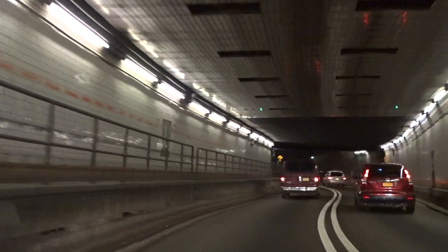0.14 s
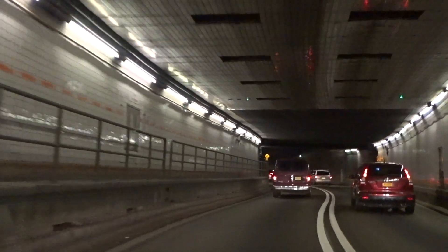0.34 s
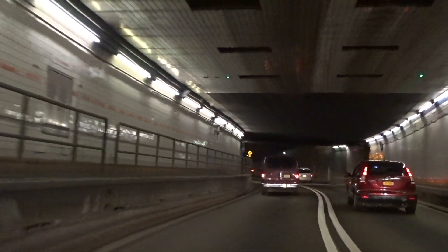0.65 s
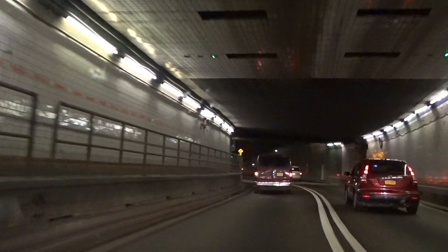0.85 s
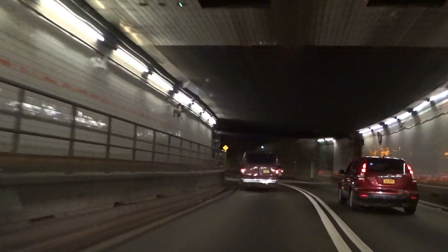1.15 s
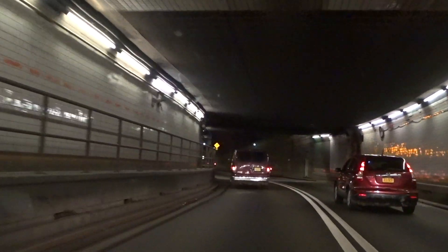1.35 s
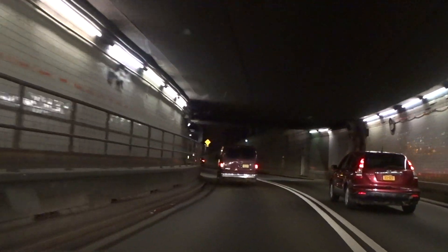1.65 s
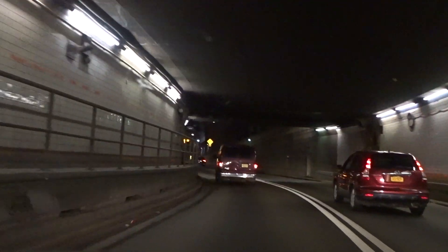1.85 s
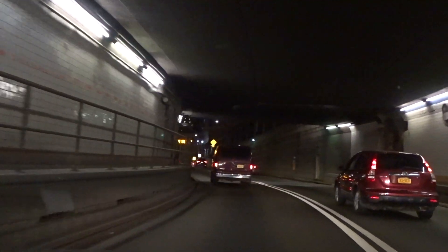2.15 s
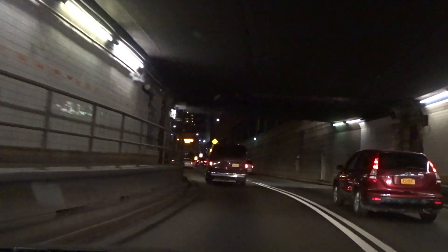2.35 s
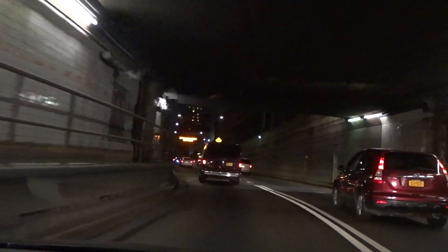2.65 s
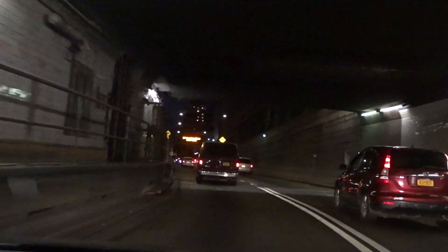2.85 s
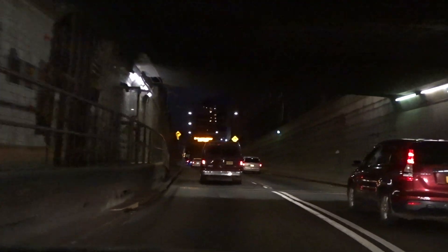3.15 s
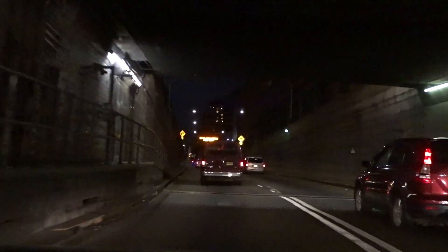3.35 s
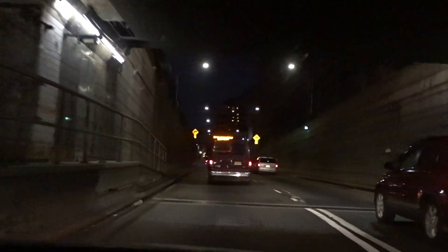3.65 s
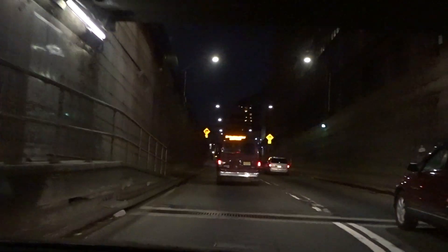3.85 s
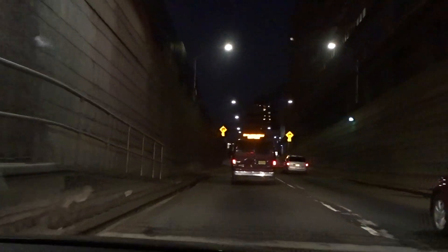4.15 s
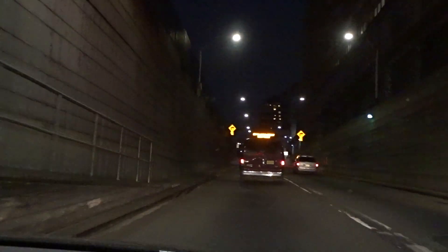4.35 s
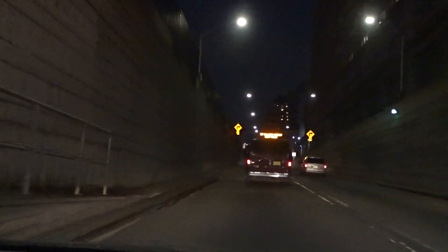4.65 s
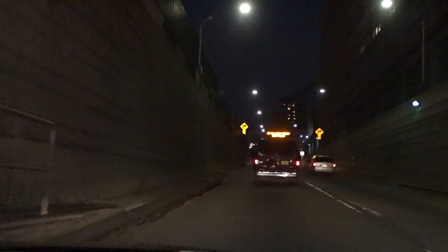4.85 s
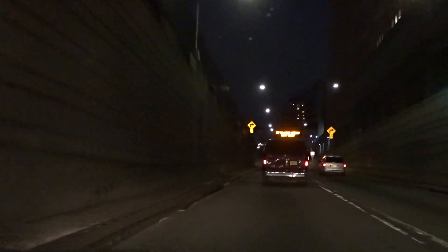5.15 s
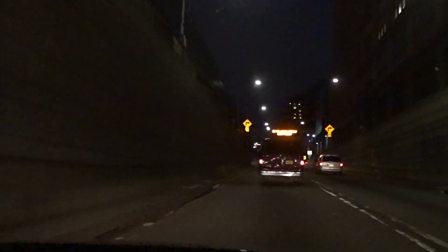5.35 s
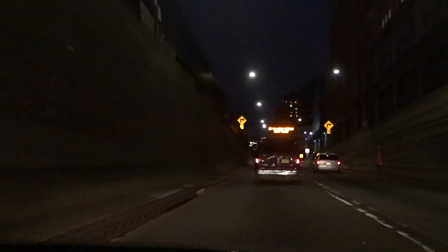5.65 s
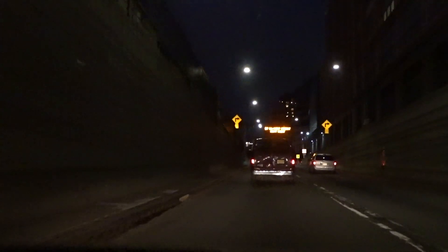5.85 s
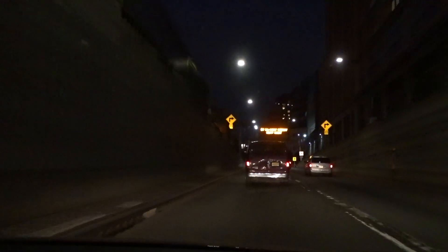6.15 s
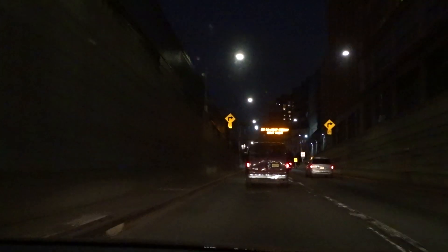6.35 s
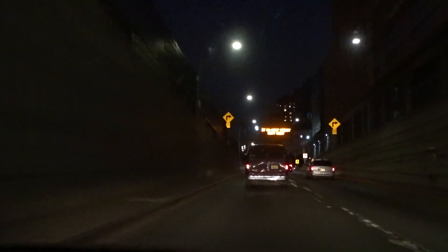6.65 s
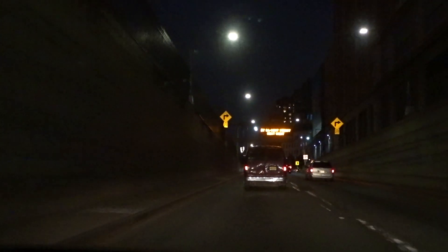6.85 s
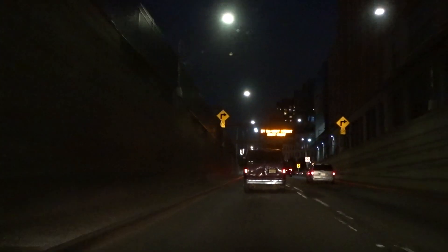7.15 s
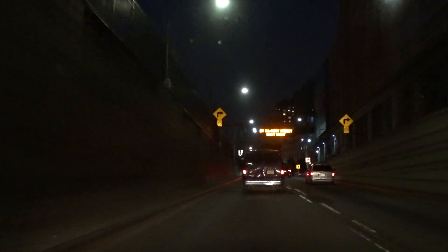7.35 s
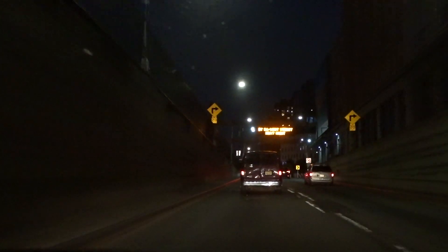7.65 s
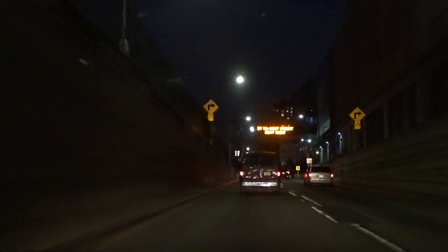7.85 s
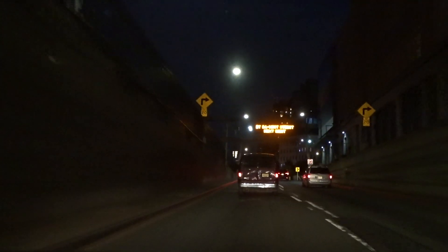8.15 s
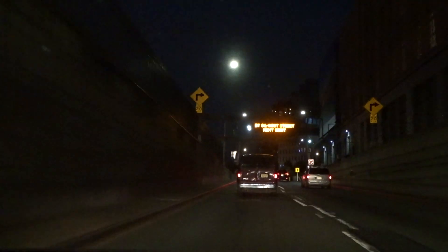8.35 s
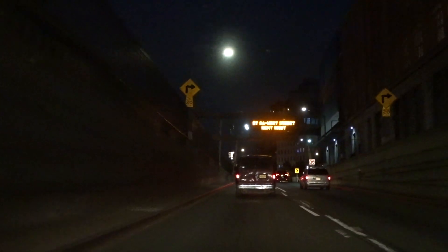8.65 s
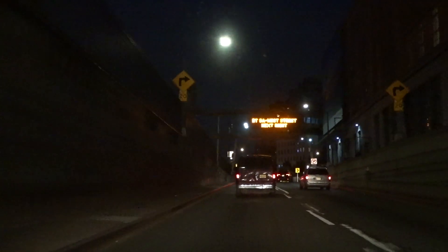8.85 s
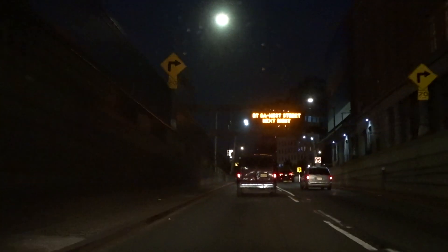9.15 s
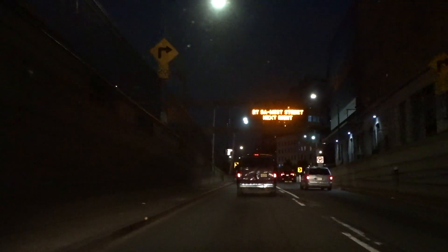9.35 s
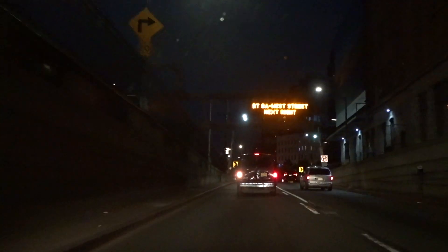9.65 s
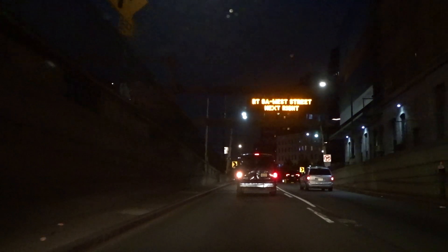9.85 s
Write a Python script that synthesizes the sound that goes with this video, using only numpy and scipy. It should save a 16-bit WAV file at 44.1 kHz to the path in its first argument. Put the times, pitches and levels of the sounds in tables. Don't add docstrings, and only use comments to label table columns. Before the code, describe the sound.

Steady cabin rumble as a car leaves a tunnel, with an early trim snap, a clattering bump midway, then quieter road noise and small ticks.

```python
import sys
import numpy as np
from scipy import signal
from scipy.fft import rfft, irfft, next_fast_len
from scipy.io import wavfile
from scipy.ndimage import uniform_filter1d, map_coordinates

SR = 44100
rng = np.random.default_rng(int(sys.argv[2]) if len(sys.argv) > 2 else 0)


def voltage_ratio(decibels):
    exponent = np.asarray(decibels, float) / 20
    return 10 ** exponent


def put_to_file(sound):
    columns = np.atleast_2d(sound).T
    safe = np.clip(columns, -1, 1)
    whole_steps = np.round(safe * 32767)
    wavfile.write(sys.argv[1], SR, whole_steps.astype(np.int16))


N = 440559
TIME_S = np.arange(N) / SR


def unit(x):
    return x / np.sqrt(np.mean(x ** 2) + 1e-20)


def along(points, hz):
    f, v = np.transpose(points)
    return np.interp(np.log(hz + 1), np.log(f + 1), v)


def curves(rows):
    s, *cols = np.transpose(rows)
    return [np.interp(TIME_S, s, c) for c in cols]


def wobble(rate):
    knots = rng.standard_normal(int(N * rate / SR) + 4)
    return map_coordinates(knots, [TIME_S * rate])


def filtered(x, response):
    m = next_fast_len(N + SR // 2)
    return irfft(rfft(x, m) * response(np.fft.rfftfreq(m, 1 / SR)), m)[..., :N]


def modes(table):
    def response(f):
        total = 0
        for k, (centre, width, db) in enumerate(table):
            resonance = 1j * f * width / (centre * centre - f * f + 1j * f * width)
            total = total + (-1) ** k * voltage_ratio(db) * resonance
        return total
    return response


def unrelated(table):
    return lambda f: np.sqrt(sum(np.abs(modes([row])(f)) ** 2 for row in table))


def rush(gain, patchy_db):
    # hz, correlation [-1..1]
    likeness = [(40, .9999), (150, .999), (230, .995), (420, .98), (600, .93), (1200, .87), (2500, .68),
                (3500, .77), (4800, .72), (7400, .83), (9800, .55)]
    z = signal.stft(rng.standard_normal((2, N)), nperseg=512)[2]
    field = rng.standard_normal(z.shape[1:])
    field = uniform_filter1d(field, size=6, axis=0)
    field = uniform_filter1d(field, size=14, axis=1)
    pair = signal.istft(z * voltage_ratio(patchy_db * unit(field)), nperseg=512)[1][:, :N]

    def response(hz):
        turn = np.arccos(np.clip(along(likeness, hz), -1, 1)) / 2
        return gain(hz) * [np.cos(turn), np.sin(turn)]

    mid, side = filtered(pair, response)
    return unit(np.array([mid + side, mid - side]))


def steadied(x, share):
    power = uniform_filter1d(uniform_filter1d(np.mean(x ** 2, axis=0), size=SR // 16), size=SR // 16)
    return unit(x / (np.abs(power) + 0.074) ** (share / 2))


def jolts():
    # peak_s, suspension_lift_db, panel_lift_db (negative:
    swings = [(.25, 0, -2.5), (.55, -5, 3.5), (5.08, 1, -2.5), (8.1, 0, -4.5), (2.98, 0, -2), (.8, -1, 2.5),
              (.97, -4, 4), (1.33, -2, -2), (1.55, -2, 1.5), (2.09, 6, 2.5), (2.78, -2, -1), (3.8, 3, 5.5),
              (3.96, -10, 4.5), (4.59, 9, 1.5), (4.73, 10, 5), (4.91, 18.5, 0), (5.26, 5, -3.5),
              (5.42, 9, 1), (6.19, 1, 1), (6.71, 2, 1.5), (7.63, 2, 5.5), (7.9, 6.5, 4), (8.71, -2, 4),
              (9.29, -12, 3.5), (9.46, 2, 2.5), (9.93, 10, 1)]
    rise_s, fall_s = 0.051, 0.056
    t = np.arange(0, N + 64, 64) / SR
    s, *lifts = np.transpose(swings)
    since = t - s[:, None]
    shape = np.exp(-(since / np.where(since < 0, rise_s, fall_s)) ** 2)
    return [np.interp(TIME_S, t, lift @ shape) for lift in lifts]


def stretches(table):
    edge_s = 0.15
    lift_db = 0
    for s, length, db in table:
        inside_s = np.minimum(TIME_S - s, s + length - TIME_S)
        lift_db = lift_db + db * np.clip(inside_s / edge_s + .5, 0, 1)
    return lift_db


def shell():
    # time_s, unevenness_db, tread_texture_db
    road = [(0, -24.5, -29), (.5, -26.5, -31), (1.1, -24.5, -29.5), (1.6, -26, -27), (2.2, -28, -27),
            (2.8, -26, -29.5), (3.4, -25.5, -27), (3.7, -28.5, -29), (4, -22.5, -29), (4.6, -24.5, -29),
            (5.05, -23.5, -31), (5.6, -26.5, -31.5), (6.4, -27, -31), (6.9, -24.5, -29.5),
            (7.7, -28, -30.5), (8.5, -26, -31), (9.1, -27.5, -28.5), (9.99, -26.5, -29)]
    heave = [(38.4, 11, 2.5), (62, 23, -16.5)]
    boom = [(103.7, 13.7, 1.5), (126.4, 10.8, -2), (164.4, 11.8, -0.5), (184.6, 6.3, -4)]
    cavity = [(228.3, 11.4, 1.5), (271.6, 37, -5)]
    drone = [(318.5, 62, -3.5), (355.5, 19.6, 3), (380, 65, -3.5), (443, 55, -4.5)]
    # start_s, length_s, lift_db (negative: dip)
    coarse = [(0, 0.42, 3), (2.35, 0.43, 1.5), (9.0, 0.43, -1), (1.2, 0.62, 2), (2.12, 1.45, 3.5),
              (3.707, 1.21, 6.5), (5.198, 0.8, 2.5), (5.9, 0.42, -1.5), (6.795, 0.31, 2), (7.55, 0.5, -3),
              (8.3, 0.88, 2), (9.62, 0.3, 4)]
    # start_s, length_s, lift_db (negative: dip)
    drone_swings = [
        (2.35, 0.75, 1.5),
        (3.35, 0.26, -2),
        (5.0, 0.4, -2),
        (5.9, 0.16, 3),
        (6.75, 0.13, 2),
        (7.2, 0.18, -3),
        (7.7, 0.15, 2.5),
        (8.5, 0.15, -2),
        (9.0, 0.16, -2.5),
    ]
    # start_s, length_s, lift_db (negative: dip)
    roof_swings = [
        (.75, 0.27, -3),
        (1.1, 0.28, 2),
        (3.05, 0.12, 3.5),
        (6.55, .2, -3.5),
        (8.1, 0.21, 3),
        (8.45, 0.32, -4),
        (9.25, 0.24, -3.5),
    ]
    uneven_db, texture_db = curves(road)
    heave_lift_db, panel_lift_db = jolts()
    roof_db = -3 - 4 / (1 + np.exp((TIME_S - 2.15) / 0.15))

    heave_db = -37 + 0.73 * (uneven_db - uneven_db.mean()) + heave_lift_db + 0.86 * wobble(5.9)
    floor_db = uneven_db - 0.5 + panel_lift_db + 0.83 * wobble(9.2)
    roof_db = uneven_db + roof_db + stretches(roof_swings) + 1.3 * panel_lift_db + 1.2 * wobble(7.2)
    cavity_db = -34.5 + 0.26 * (texture_db - texture_db.mean()) + stretches(coarse) + 0.58 * wobble(12.0)
    drone_db = texture_db + 0.28 + stretches(drone_swings) + 0.47 * wobble(9.5)
    parts = [(heave_db, heave, 22, 90), (floor_db, boom[:2], 85, 170), (roof_db, boom[2:], 120, 205),
             (cavity_db, cavity, 200, 310), (drone_db, drone, 290, 520)]
    out = 0
    for db, table, low_hz, top_hz in parts:
        def gain(hz):
            edges = 1 / np.sqrt((1 + (low_hz / (hz + 1)) ** 6) * (1 + (hz / top_hz) ** 6))
            return unrelated(table)(hz) * edges
        out = out + voltage_ratio(db) * steadied(rush(gain, patchy_db=-1.5), 0.37)
    return out


def tyre_roar():
    # time_s, level_db
    air = [(0.0, -34), (0.42, -34.5), (1.0, -34.5), (3.0, -34), (3.25, -34.5), (4.54, -36), (4.84, -36.5),
           (5.12, -38.5), (5.62, -40.5), (5.87, -38.5), (6.09, -39.5), (7.96, -39.5), (9.65, -40.5),
           (9.99, -39)]
    # freq_hz, density_db
    roar_colour = [(280, -29), (480, 0), (503, -3), (621, -6.5), (817, -4), (1010, -6.5), (1140, -7.5),
                   (1310, -18), (2000, -21.5), (2600, -57), (4400, -120)]
    # freq_hz, density_db
    whoosh_colour = [(760, -11.5), (1300, -1.5), (1570, -6), (1770, -19.5), (2180, -7), (2360, -8.5),
                     (2550, -11), (3570, -15), (4100, -17.5), (4800, -24), (6240, -54), (10600, -120)]
    roar_db, = curves(air)
    whoosh_db = -50.5 + 1.23 * (roar_db - roar_db.mean())
    roar = rush(lambda hz: voltage_ratio(along(roar_colour, hz)), patchy_db=0.95)
    whoosh = rush(lambda hz: voltage_ratio(along(whoosh_colour, hz)), patchy_db=1.0)
    roar = voltage_ratio(roar_db + 0.5 + 0.19 * wobble(6.4)) * roar
    return roar + voltage_ratio(whoosh_db + 0.95 + 0.41 * wobble(9)) * whoosh


def engine():
    # time_s, pitch_hz, level_db
    firing = [
        (.7, 56, -50),
        (1.2, 58, -63),
        (1.8, 62, -48),
        (2.4, 64.7, -35),
        (2.8, 68.8, -39.5),
        (3.3, 70.5, -40),
    ]
    hz, db = curves(firing)
    fade_in = np.clip((TIME_S - firing[0][0]) / .3, 0, 1)
    fade_out = np.clip((firing[-1][0] - TIME_S) / .3, 0, 1)
    tone = np.sin(2 * np.pi * np.cumsum(hz) / SR)
    return np.sqrt(2) * voltage_ratio(db + .8 * wobble(5.8)) * fade_in * fade_out * tone


def neighbour():
    # centre_hz, width_hz, level_db
    tread = [(386, 28, 0), (442, 60, -2.5)]
    level_s, pass_s = 2.7, 0.39
    near = 1 / (0.5 + ((TIME_S - level_s) / pass_s) ** 4)
    return voltage_ratio(-32.5) * near * rush(lambda hz: unrelated(tread)(hz) ** 2, patchy_db=2.0)


def crack(noise, t, t60):
    direct = voltage_ratio(-60 * t / t60)
    answer = voltage_ratio(-12.0 - 15 * t / t60)
    return noise * (direct + answer) * (1 - np.exp(-t / 0.000091))


def chatter():
    start_s, end_s, per_s = 4.73, 4.99, 110
    when, size, pitch = rng.random((40, 3)).T
    times = start_s + (np.arange(len(when)) + when) / per_s
    return [(s, -54.5 + 9 * a, 4.0, 5500 + 2800 * p, .006) for s, a, p in zip(times, size, pitch) if s < end_s]


def ticks():
    # time_s, body_db, edge_over_body_db, edge_hz, t60_s
    rattles = [(4.6154, -53, 3, 9000, .012), (4.6452, -27, -1, 7560, 0.017), (4.6745, -34, -1.5, 7800, .01),
               (4.7154, -29.5, -1.5, 7170, 0.032), (4.7594, -49, -15, 5600, 0.017),
               (4.78, -37, -8, 6000, 0.014), (4.8234, -40.5, 1, 6970, .016), (4.8794, -58, 4, 7000, .03),
               (4.928, -37, -13, 6000, 0.022), (4.9398, -34.5, 0, 6200, 0.02), (4.962, -43, 14, 6840, 0.03),
               (4.975, -47, 3, 7540, .02), (5.0087, -48, 4, 7600, .02), (4.706, -42, -4, 8000, .02),
               (4.7185, -34, -5, 8800, .03), (4.785, -50, 8, 8000, .012), (4.877, -50.5, 7, 7800, .012),
               (4.905, -51, 7, 8600, .012)]
    # time_s, body_db, edge_over_body_db, edge_hz
    small = [(1.667, -51, 6.5, 8060), (1.9123, -47, 7.5, 7300), (2.83, -57, 8, 7500),
             (1.964, -56.5, 13.5, 8900), (2.994, -36, -13, 6500), (3.8766, -44, -3, 8000),
             (4.4487, -38, -8, 6960), (5.748, -47, 1, 6500), (6.2067, -50, 3, 8000),
             (6.4038, -46, -11, 6140), (7.304, -59, -2, 5800), (7.406, -57, -1, 8640),
             (7.534, -54, 4, 8300), (7.688, -53, 0, 7800), (8.078, -41.5, -4, 7600), (8.117, -49, -7, 7740),
             (8.17, -58, 5, 6100), (8.492, -59, 2, 6100), (8.525, -56, -1, 7740), (8.584, -49, -1, 6000),
             (8.64, -48, -5, 7200), (8.771, -52, -2, 6100), (8.983, -58, 7, 8350), (9.0169, -49, -2, 7300),
             (9.2633, -44.5, -4, 7240), (9.315, -57, -2, 6250), (9.355, -55, -1, 7900),
             (9.466, -50, 0, 8000), (9.658, -56, -2, 6000), (9.716, -59, -1, 6000), (9.883, -57, 1, 8100),
             (9.917, -58, -1, 6500), (9.9594, -54, -9, 5610), (9.979, -49, -4, 6500), (1.27, -58, 9, 7300),
             (2.3, -58, 9, 7300), (3.34, -55, 8, 7000)]
    # time_s, body_db, edge_over_body_db, edge_hz, body_hz
    clicks = [
        (2.5243, -27.5, -23, 6000, 3200),
        (2.5324, -23.5, -25, 5640, 3250),
        (7.793, -39, -7, 5700, 3900),
        (9.5478, -37, -7, 6200, 2700),
        (8.0748, -38, -2, 7400, 2700),
    ]
    # centre_hz, width_hz, level_db
    strip_modes = [(5900, 690, 0.0062), (8400, 1900, 0)]
    t = np.arange(4096) / SR
    f = np.fft.rfftfreq(len(t), 1 / SR)
    out = np.zeros((2, N + SR))
    # t60_s, body_hz, body spread, share of plain crack beside the strip
    rows = [(*row, 2450, 1.45, 1) for row in [*rattles, *chatter()]]
    rows += [(*row, .03, 3100, 1.3, .12) for row in small]
    rows += [(*row[:4], .016, row[4], 1.22, .4) for row in clicks]
    chance = rng.standard_normal((len(rows), 3, len(t)))

    def band(hz, spread):
        return modes([(hz / spread, .5 * hz, 0), (hz * spread, .5 * hz, 0)])(f) ** 2

    strip = unrelated(strip_modes)(f) ** 2
    dull = 1 / (1 + (f / 10300) ** 12)
    for (s, db, edge_db, high_hz, t60, body_hz, wide, plain), (both, *each) in zip(rows, chance):
        low_hz = body_hz * (1 + .04 * both[0])
        burst = rfft(crack(both + 0.4 * np.array(each), t, t60))
        burst /= uniform_filter1d(np.abs(burst) ** 2, size=60, axis=1) ** 0.23
        body = band(low_hz, wide)
        edge = band(high_hz, 1.39) * (plain + (1 - plain) * strip) * dull
        for level_db, shape in (db, body), (db + edge_db + 2.0, edge):
            part = irfft(burst * shape, len(t))
            out[:, round(s * SR):][:, :len(t)] += voltage_ratio(level_db) * part / np.abs(part).max()
    return out[:, :N]


def knocks():
    # time_s, peak_db, pitch_hz, t60_s
    parts = [
        (4.601, -19, 799, .13),
        (4.686, -19, 497, .09),
        (5.813, -43.5, 2281, .078),
        (5.813, -40.5, 1621, .079),
        (9.204, -26, 621, .031),
        (9.548, -41, 2450, .02),
        (4.717, -33, 2000, .03),
        (9.982, -42, 2500, .03),
    ]
    out, t = np.zeros(N + SR), np.arange(SR // 4) / SR
    for s, db, hz, t60 in parts:
        ring = voltage_ratio(db - 60 * t / t60) * np.sin(2 * np.pi * hz * t)
        out[round(s * SR):][:len(t)] += ring * (1 - np.exp(-t / 0.0019))
    return out[:N]


def snap():
    # time_s, peak_db, left_minus_right_db
    s, db, pan_db = (.1788, -14, 1)
    # freq_hz, level_db, t60_s
    panel = [(1300, -9, 0.02), (1960, -5, 0.02), (2230, -5, 0.014), (2500, -4.5, 0.012), (2820, 1.5, 0.016),
             (3020, -1, 0.014), (3710, -3, 0.014), (4080, -5, 0.012), (5800, -14, .012), (7150, -16, .008),
             (7950, -13, 0.011), (8550, -4.5, 0.011), (9400, -12, 0.009), (10500, -20, .008)]
    out, rattle, t = np.zeros((2, N)), np.zeros((2, N)), np.arange(4096) / SR
    ring = 0
    for k, (hz, level, t60) in enumerate(panel):
        phase = np.array([[.36], [-.36]]) * (-1) ** k
        ring = ring + (-1) ** k * voltage_ratio(level - 60 * t / t60) * np.sin(2 * np.pi * hz * t + phase)
    noise = rng.standard_normal(len(t)) + 0.4 * rng.standard_normal((2, len(t)))
    start = round(s * SR)
    out[:, start:][:, :len(t)] = voltage_ratio(db) * ring * (1 - np.exp(-t / 0.00014))
    rattle[:, start:][:, :len(t)] = voltage_ratio(db + 2.5) * crack(noise, t, 0.021)
    wide = [(hz, 0.15 * hz, level) for hz, level, _ in panel]
    creep = modes([(3700, 800, -19), (7500, 1500, -27)])
    early = np.roll(rattle, -round(.0172 * SR), axis=1)
    pan = voltage_ratio([[pan_db / 2], [-pan_db / 2]])
    return pan * (out + filtered(rattle, modes(wide)) + filtered(early, creep))


def rustle():
    # time_s, level_db
    rub = [(0.0, -60.5), (0.72, -61.5), (1.89, -60), (2.17, -55.5), (2.47, -59), (3.36, -57.5), (3.7, -61),
           (4.48, -59), (4.87, -55), (5.09, -58), (5.51, -63.5), (5.98, -61), (6.34, -66.5), (7.04, -66),
           (8.24, -63), (8.93, -67.5), (9.99, -65.5)]
    # freq_hz, density_db
    colour = [(2350, -4), (4000, -4.5), (4750, -10.5), (4950, -3.5), (5460, -3), (5560, -0.5), (6030, -4.5),
              (7340, -0.5), (7920, -1), (8450, -4.5), (9080, -4.5), (10100, -10.5), (11100, -11),
              (14400, -53), (22000, -120)]
    # start_s, length_s, centre_hz, width_hz,
    # level_db
    swells = [(2.046, .062, 9080, 650, -53), (2.049, .066, 5850, 600, -62), (2.19, .1, 9700, 1200, -60),
              (2.2, .14, 7600, 1500, -62), (5.744, .1, 9100, 900, -62), (5.746, .04, 5700, 350, -62),
              (.03, .101, 6610, 1210, -58.5), (.031, .111, 8950, 510, -62.5), (5.848, .271, 9700, 2510, -66),
              (1.251, .27, 7900, 2510, -62), (3.22, .2, 8200, 3010, -62.5), (7.551, .51, 6040, 710, -74.5),
              (8.101, .71, 6080, 610, -70.5), (4.7, .26, 2500, 1600, -52), (2.02, .2, 3200, 1600, -57)]
    rub_db, = curves(rub)
    slips_per_s = 45 * voltage_ratio(1.2 * (rub_db - rub_db.mean()))
    size = voltage_ratio(4.7 * np.minimum(rng.exponential(size=N), 3))
    slips = size * (rng.random(N) < slips_per_s / SR)
    grit = 1 + 0.17 * signal.lfilter([1], [1, -np.exp(-1 / (0.0046 * SR))], slips)
    rubbing = grit * rush(lambda hz: voltage_ratio(along(colour, hz)), patchy_db=0.5)
    out = voltage_ratio(rub_db + 2.0 + 1.03 * wobble(16)) * unit(rubbing)
    for s, length, hz, width_hz, db in swells:
        passed = np.clip((TIME_S - s) / (1.4 * length), 0, 1)
        press = np.clip(1.5 * np.sin(np.pi * passed ** 0.43), 0, 1)
        band = modes([(hz, width_hz, 0)])
        noise = rng.standard_normal(N) + .35 * rng.standard_normal((2, N))
        out += voltage_ratio(db) * press * unit(filtered(noise, lambda f: band(f) ** 2))
    return out


def vents():
    # centre_hz, width_hz, level_db
    hiss_bands = [(3450, 450, -3), (6020, 420, -5), (8500, 600, -5), (10200, 1800, -8)]
    # time_s, pitch_hz, level_db
    fan = [
        (5.9, 672.4, -58),
        (6.6, 678, -49.5),
        (7.6, 681, -49),
        (8.8, 677, -49.5),
        (9.5, 676, -53),
        (9.99, 677, -53),
    ]
    hz, db = curves(fan)
    heard = np.clip((TIME_S - fan[0][0]) / .4, 0, 1)
    level = voltage_ratio(db + 1.7 * wobble(5))
    hz = hz + 1.3 * wobble(9.8)
    motor = 0
    for offset_hz, side_db in [(0, 0), (43, -6.5)]:
        motor = motor + voltage_ratio(side_db) * np.sin(2 * np.pi * np.cumsum(hz + offset_hz) / SR)
    hiss = rush(lambda f: unrelated(hiss_bands)(f) ** 2, patchy_db=3.0)
    return np.sqrt(2) * heard * level * motor + voltage_ratio(-67.5 + 0.92 * wobble(1.6)) * hiss


def scene():
    road = shell() + tyre_roar() + engine() + neighbour()
    trim = ticks() + knocks() + snap() + rustle()
    return road + trim + vents()


def top_cut(x):
    return signal.sosfilt(signal.butter(12, 11600, fs=SR, output="sos"), x)


def record(dry):
    # freq_hz, difference_db
    lean = [(40, 0), (70, .4), (160, .3), (300, .3), (1200, -.2), (2400, .7), (3400, -.8), (6500, -1.1),
            (8500, -.2), (10500, -3)]
    # freq_hz, phase_rad
    lead = [(45, .01), (75, .07), (160, .12), (300, .16), (600, .21), (1700, .17), (2800, .1), (4700, .3),
            (6500, -.05), (10500, -.25)]
    # time_s, share_engaged [0..1.1]
    guard = [(0, 0), (3.7, 0), (3.95, 0.1), (4.2, 0.23), (4.62, 0.26), (4.72, 1), (5.0, 1.1), (5.3, .6),
             (5.6, 0.1), (5.9, 0), (9.99, 0)]
    # freq_hz, phase_rad
    guard_lead = [(40, .35), (75, .5), (110, 0.23), (190, 0.53), (300, 0.48), (420, 0.34), (600, .3),
                  (850, 0.4)]
    guard_lean = [(500, .9), (900, 0)]  # Hz, dB

    def unequal(lean_points, lead_points, hz):
        half = lambda points: np.outer([.5, -.5], along(points, hz))
        return voltage_ratio(half(lean_points)) * np.exp(1j * half(lead_points))

    calm = filtered(dry, lambda hz: unequal(lean, lead, hz) * (hz < 11020))
    guarded = filtered(calm, lambda hz: unequal(guard_lean, guard_lead, hz))
    share, = curves(guard)
    pair = calm + share * (guarded - calm)
    top, knee = .65, 4
    return top_cut(pair / (1 + np.abs(pair / top) ** knee) ** (1 / knee))


dry = scene()
out = record(dry)
put_to_file(out)
```